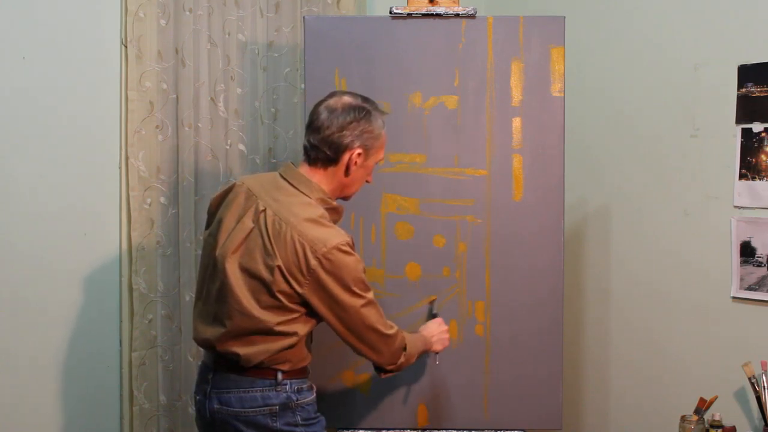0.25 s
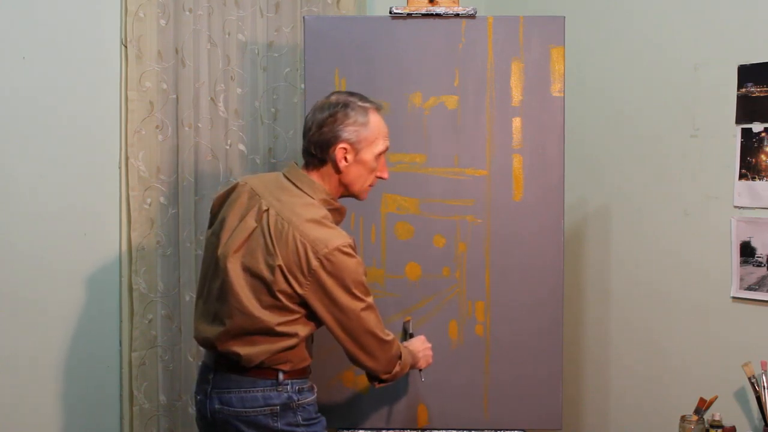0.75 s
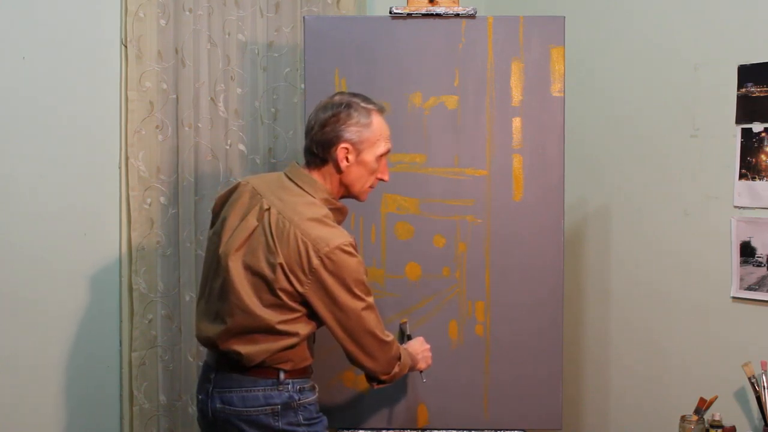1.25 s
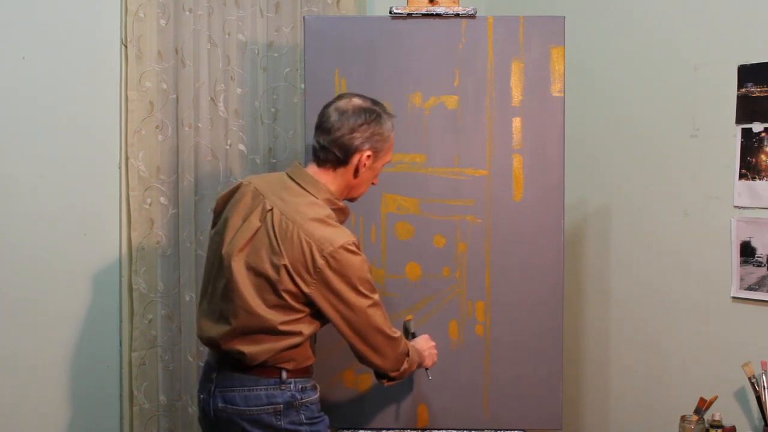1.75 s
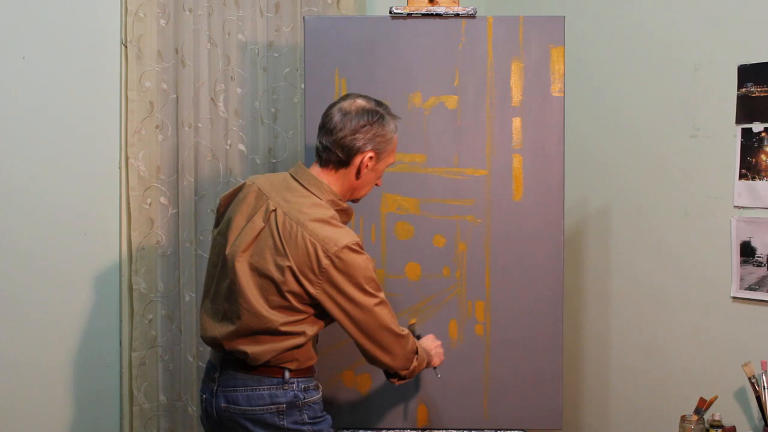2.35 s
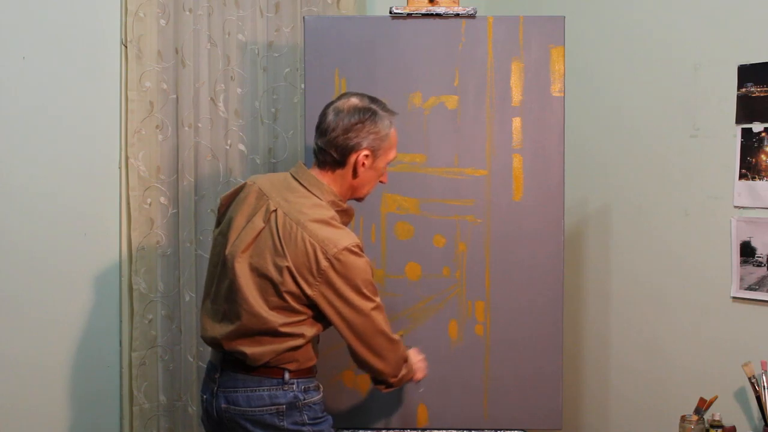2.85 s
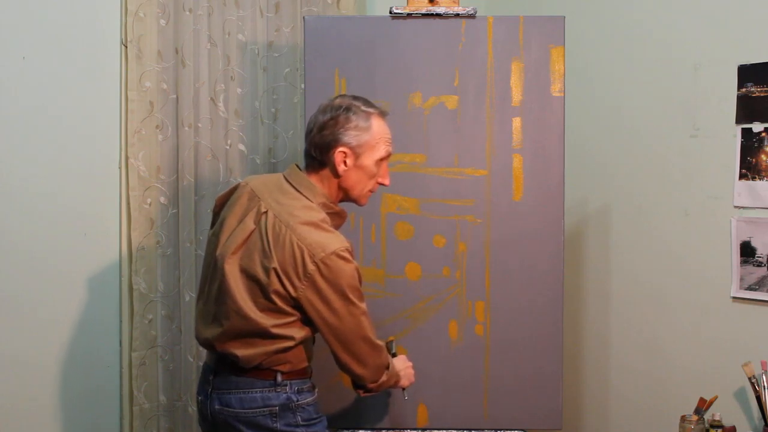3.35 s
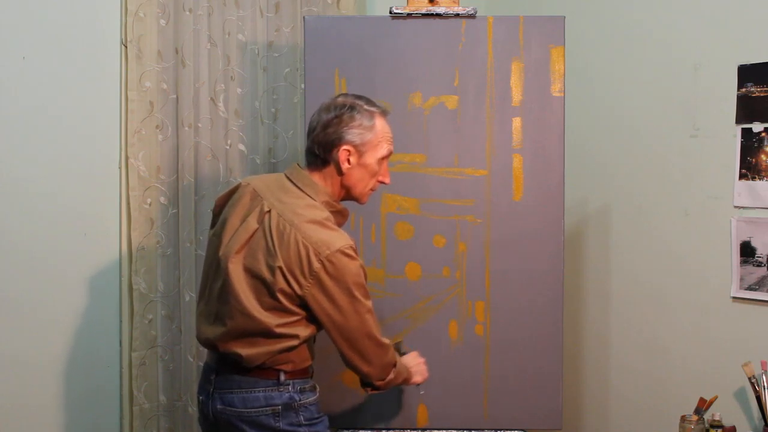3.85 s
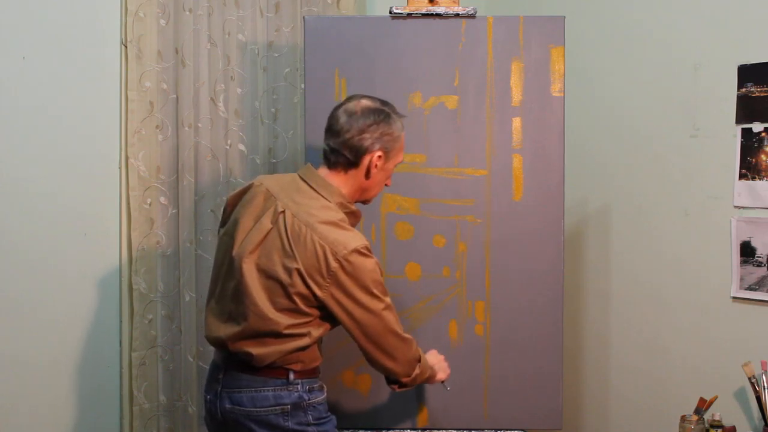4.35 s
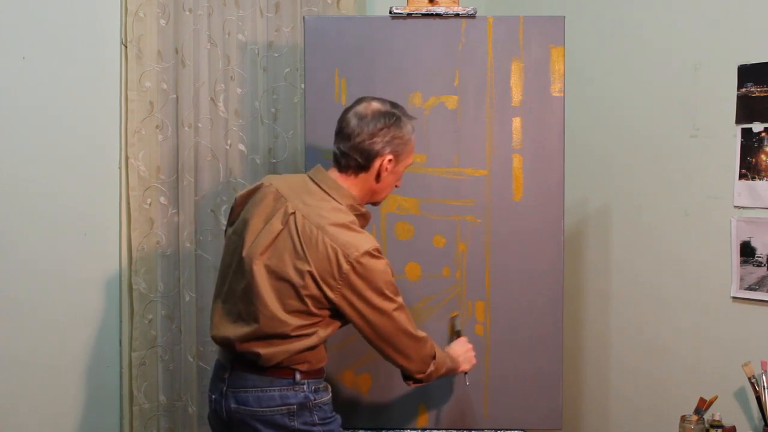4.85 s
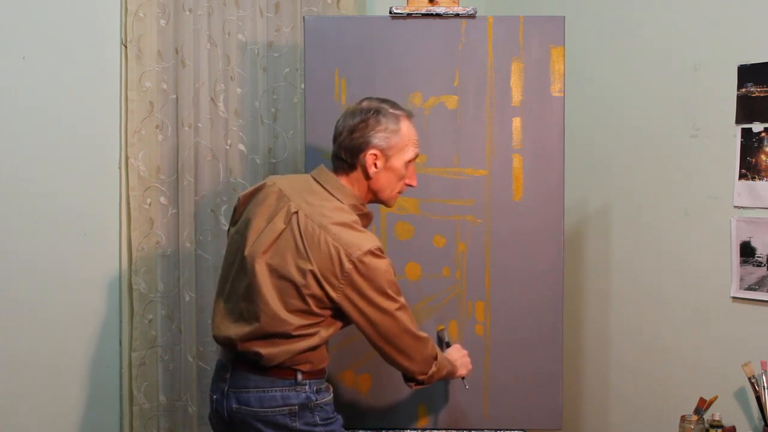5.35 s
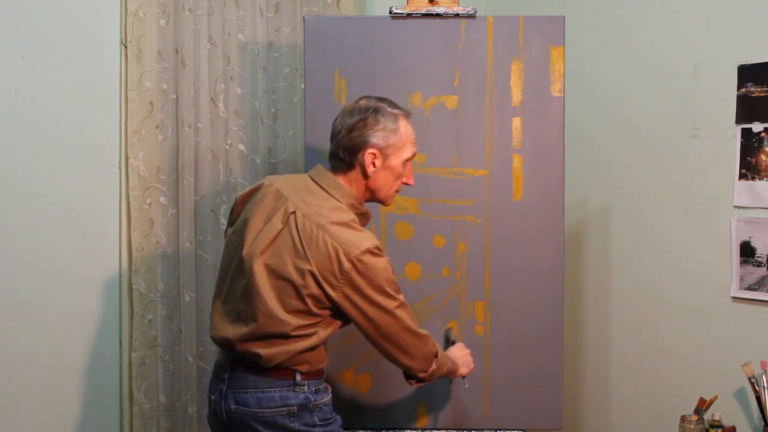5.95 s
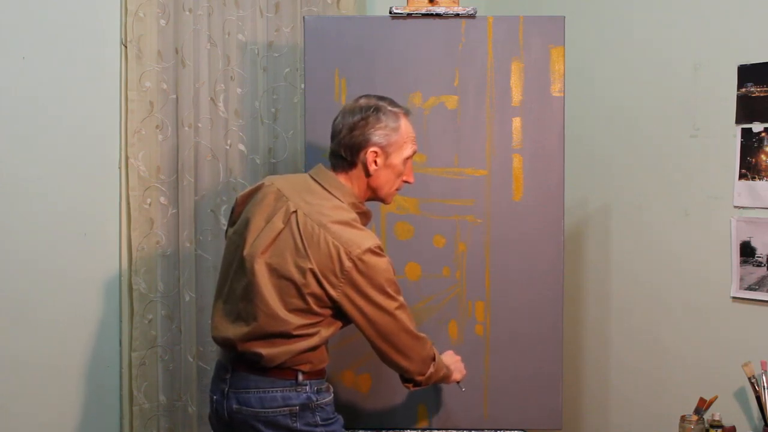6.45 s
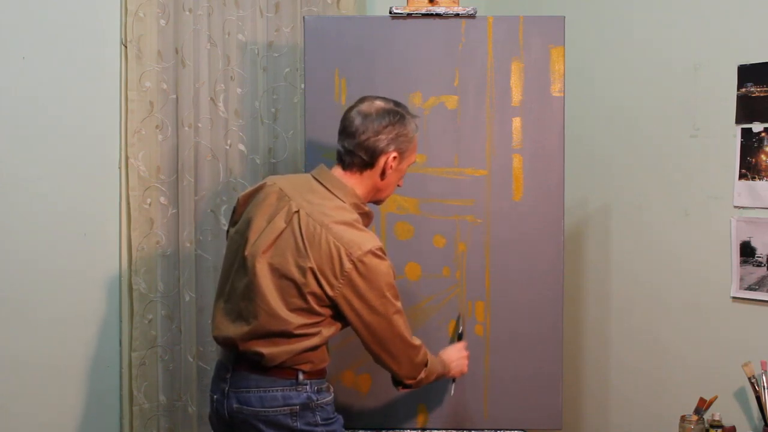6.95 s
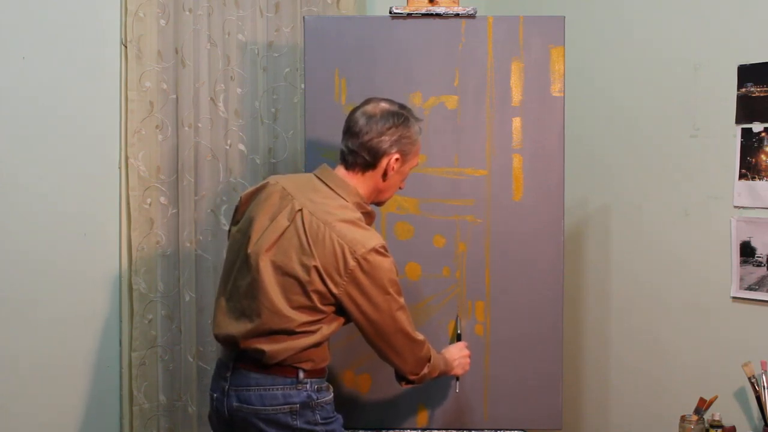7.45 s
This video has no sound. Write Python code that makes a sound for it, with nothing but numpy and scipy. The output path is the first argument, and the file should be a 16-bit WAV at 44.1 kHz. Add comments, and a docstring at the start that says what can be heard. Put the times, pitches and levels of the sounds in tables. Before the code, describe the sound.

Quick to-and-fro bristle strokes rasp on taut canvas, about five or six a second, each a short soft-edged swish with a hollow papery body. They come in groups separated by short pauses, strongest before the middle, weaker and sparser late. Faint thin squeaks, muffled pushes on the cloth and soft rustling join in. A muffled engine passes outside over a deep unsteady drone. Close microphone in a small room with short reverb.

```python
"""In a small studio a painter scrubs a stiff brush to and fro over a stretched canvas, with short pauses.
Random bristle slips hiss, scratch, drum the canvas and ring faintly in the brush; softer strokes sound darker.
Pushes of the tuft boom, thin wavering tones squeak, and a soft low rustle swells; all of these get a short reverb.
Outside an engine gathers speed as it passes, a stack of sines, over a deep unsteady drone and quiet room noise."""
import sys
import numpy as np
from scipy import signal
from scipy.fft import rfft, irfft, next_fast_len
from scipy.io import wavfile

SR = 44100
rng = np.random.default_rng(int(sys.argv[2]) if len(sys.argv) > 2 else 0)


def output_pcm(signal):
    """Save a mono or channel-first signal as 16-bit PCM at the path in sys.argv[1].

    Samples are clipped to [-1, 1] before scaling.
    """
    pcm = np.clip(np.atleast_2d(signal).T, -1, 1) * 32767
    wavfile.write(sys.argv[1], SR, np.round(pcm).astype(np.int16))


N = 340026
T = np.arange(N) / SR  # time in seconds

# The brush lands or turns and nudges the canvas.
# Each row: time of the strongest push in s, length in s, boom of the cloth in dB, scrape of bent bristles in dB.
NUDGE_MOVES = [(.45, 0.13, -52, -53), (1.651, 0.097, -50, -57), (2.333, 0.073, -53.5, -60),
               (4.497, 0.31, -49.5, -53.5), (7.31, 0.14, -45.5, -48), (7.584, .125, -45.5, -60)]
NUDGE_RISE_SHARE = 0.42  # part of a nudge spent pushing in


def undb(db):
    """Decibels to gain."""
    return 10 ** (np.asarray(db) / 20)


def unit(x):
    """Scale to rms 1."""
    return x / np.sqrt(np.mean(x ** 2))


def curves(table):
    """Each column after the time, joined by straight lines and held at the ends."""
    s, *columns = np.transpose(table)
    return [np.interp(T, s, c) for c in columns]


def filtered(x, response):
    """Pass x through a response given as a function of frequency."""
    size = next_fast_len(N + SR // 2)
    hz = np.fft.rfftfreq(size, 1 / SR) + 1e-3  # just above zero, so that logarithms work
    return irfft(rfft(x, size) * response(hz), size)[:N]


def colour(x, points):
    """Equalise x through (Hz, dB) points joined on a log frequency axis, at rms 1."""
    hz, db = np.transpose(points)
    return unit(filtered(x, lambda f: undb(np.interp(np.log(f), np.log(hz), db))))


def resonate(x, modes):
    """Excite damped (Hz, width Hz, dB) modes with x, at rms 1."""
    def response(f):
        total = 0
        for hz, width, db in modes:
            gain = undb(db) / np.sqrt(width)
            total = total + gain / (1 + 1j * (f * f - hz * hz) / (f * width))
        return total
    return unit(filtered(x, response))


def walk(rate_hz):
    """Smooth random curve that moves mostly slower than rate_hz, at rms 1."""
    return unit(filtered(rng.standard_normal(N), lambda f: 1 / (1 + (f / rate_hz) ** 4)))


def catches(per_s, spread_db):
    """Tiny impulses at random moments, each of its own size and sign, at rms 1."""
    size_db = spread_db * np.clip(rng.standard_normal(N), -2, 2)
    size = rng.choice([-1, 1], N) * undb(size_db)
    chance = np.clip(per_s / SR, 1e-4, 1)
    # dividing by the root keeps the power even while the density changes
    return unit((rng.random(N) < chance) * size / np.sqrt(chance))


def swing(peak_s, length_s, rise_share=.46, roundness=1.19):
    """One smooth swell, as of a hand's speed: from rest to a top of 1 and back to rest."""
    side_s = length_s * np.where(T < peak_s, rise_share, 1 - rise_share)
    u = (T - peak_s) / side_s
    speed, moving = np.zeros(N), np.abs(u) < 1
    speed[moving] = np.cos(np.pi / 2 * u[moving]) ** roundness
    return speed


def brush(slow_per_s=1500, fast_per_s=8000, tuft_db=-0.43, tuft_hz=70, bend_s=0.0022, ring_db=-16):
    """A faster stroke crosses more threads; the same slips feed the hiss, scratch, canvas and the brush's ring."""
    # Strokes. Each row: time of top speed in s, length in s, level of the hiss in dB.
    strokes = [ (.005, 0.16, -47), (0.166, 0.19, -45.5), (.28, .27, -44.5), (0.52, .22, -43),
               (1.252, 0.14, -58), (1.418, 0.18, -45), (1.53, 0.13, -48.5), (1.655, .135, -44),
               (1.773, 0.2, -44.5), (1.958, 0.19, -40), (2.096, 0.18, -42), (2.243, .16, -43),
               (2.39, 0.2, -44), (2.595, .22, -39.5), (2.825, .21, -39.5), (2.927, 0.21, -46.5),
               (3.745, 0.24, -56.5), (3.978, 0.29, -47.5), (4.121, 0.27, -44.5), (4.315, 0.21, -42.5),
               (4.473, 0.17, -49), (4.562, .25, -42), (4.762, 0.18, -43), (4.915, 0.17, -44.5),
               (5.036, .18, -44), (5.192, .19, -50.5), (5.33, .14, -52), (5.478, 0.15, -50.5),
               (5.622, 0.21, -50), (5.866, .19, -45.5), (6.099, .185, -43.5), (6.393, 0.12, -57),
               (6.555, 0.17, -48), (6.646, .24, -46), (7.306, 0.18, -53), (7.602, 0.15, -53)]
    # Tone of the bristle tips on the weave. Each row: frequency in Hz, relative level in dB.
    hiss_tone = [(800, -39), (2000, -7), (3200, -11.5), (4400, -4.5), (5600, -3), (7000, 0), (8100, -2),
                 (9500, -10), (12000, -22.5), (15500, -39)]
    # Tone of bent bristles dragging. Each row: frequency in Hz, relative level in dB.
    scratch_tone = [(800, -14), (1800, -19), (2600, -2), (3500, 0.5), (4500, -3.5), (6000, -5.5),
                    (8000, -20), (12000, -52), (15500, -62)]
    # Tone of the canvas as a sounding board. Each row: frequency in Hz, relative level in dB.
    canvas_tone = [(90, -9), (200, -4), (340, 6), (520, 1), (680, 1), (1080, 6.5), (1330, 4.5), (1560, 7.5),
                   (2100, 4), (2700, 5), (4000, -15), (8000, -33.5), (15500, -58)]
    # Modes of the brush ferrule and handle. Each row: frequency in Hz, width in Hz, relative level in dB.
    brush_modes = [(1123, 70, -4), (1580, 45, 6), (1670, 29, -13), (2440, 40, -5), (2860, 26, -8),
                   (3060, 28, -1), (6900, 60, -7)]
    firm_db = -43.5  # hiss of an ordinary firm stroke
    # level in a firm stroke with a wet brush, and dB gained per dB of hiss
    scratch_db, scratch_db_per_db = -49.5, 0.96
    canvas_db, canvas_db_per_db = -49, 0.5
    drying_db_per_s = 0.32  # the brush grows scratchier as its paint runs out

    speed, tip_power, scratch_power, canvas_power = np.zeros((4, N))
    for s, length, db in strokes:
        stroke = swing(s, length)
        speed += stroke
        tip_power += (stroke * undb(db)) ** 2
        # tips touch first; the darker sounds swell a moment later, as bristles bend, and grow less with effort
        bent = swing(s + bend_s, length)
        effort_db = db - firm_db
        stroke_scratch_db = scratch_db + scratch_db_per_db * effort_db + drying_db_per_s * s
        scratch_power += (bent * undb(stroke_scratch_db)) ** 2
        canvas_power += (bent * undb(canvas_db + canvas_db_per_db * effort_db)) ** 2

    # a nudge bends the bristles without sweeping the tips
    scrape = sum(undb(db) * swing(s, length, NUDGE_RISE_SHARE) for s, length, _, db in NUDGE_MOVES)
    scratch_level = np.sqrt(scratch_power + scrape ** 2)
    canvas_level = np.sqrt(canvas_power + scrape ** 2)

    # bristles let go in tufts, so the rubbing is never even
    slips = catches(slow_per_s + fast_per_s * speed, spread_db=2.8) * undb(tuft_db * walk(tuft_hz))
    # each slip kicks every part of the brush and cloth with its own sign
    tips, shafts, cloth, handle = slips * rng.choice([-1, 1], (4, N))
    ring = undb(ring_db) * resonate(handle, brush_modes)
    hiss = np.sqrt(tip_power) * (colour(tips, hiss_tone) + ring)
    scratch = scratch_level * colour(shafts, scratch_tone)
    drumming = canvas_level * colour(cloth, canvas_tone)
    return hiss + scratch + drumming


def rustle(rise_share=0.44):
    """Soft low rustle that swells and fades, perhaps cloth, with road noise in the long swell."""
    # Swells of the rustle. Each row: time of the peak in s, length in s, level in dB.
    swells = [(.25, 1.2, -53.5), (1.482, 0.73, -55), (3.98, .45, -51.5), (5.1, 3.26, -52),
              (6.714, 2.4, -53), (7.443, 0.74, -48)]
    # Tone of the rustle. Each row: frequency in Hz, relative level in dB.
    rustle_tone = [(100, -1), (200, 1), (300, 1), (380, -1.5), (520, -1), (750, -4.5), (1100, -4.5),
                   (2000, -12.5), (4000, -18.5), (8000, -20.5), (14000, -60)]
    power = sum((undb(db) * swing(s, length, rise_share)) ** 2 for s, length, db in swells)
    return np.sqrt(power) * colour(catches(per_s=2500, spread_db=3.0), rustle_tone)


def air(level_db=-49.5, drift_db=0.5):
    """Quiet room noise whose level drifts a little."""
    # Tone of the still studio air. Each row: frequency in Hz, relative level in dB.
    air_tone = [(25, -19), (42, 6), (70, -6), (125, 3), (190, -1), (300, -7.5), (600, -12), (1000, -9.5),
                (1270, -13.5), (1600, -13.5), (3000, -20), (7000, -26), (11000, -35.5), (15500, -46)]
    return colour(rng.standard_normal(N), air_tone) * undb(level_db + drift_db * walk(3.0))


def drone(centre_hz=43.8, waver=0.062, flutter_db=2.5):
    """A deep drone near 44 Hz, later probably the engine's lowest order: one sine, unsteady in pitch and level."""
    # Swells of the drone. Each row: time in s, level in dB.
    swells = [(.4, -57), (.9, -68), (3.4, -77), (3.6, -54), (4.3, -60), (5.0, -52.5), (6.1, -57)]
    level_db, = curves(swells)
    phase = 2 * np.pi * np.cumsum(centre_hz * (1 + waver * walk(8.2))) / SR
    return np.sqrt(2) * undb(level_db + flutter_db * walk(9.1)) * np.sin(phase)


def engine(waver=0.0022, flutter_db=-0.3):
    """Low multiples of the turning rate come through the walls, swelling where they meet a room mode."""
    # The engine gathers speed. Each row: time in s, turning rate in Hz.
    turning = [(2.7, 42.66), (3.28, 45.02), (4.98, 48.7), (6.9, 50.83), (7.2, 50.8)]
    # It nears and leaves. Each row: time in s, level in dB added to every order.
    passing = [(2.0, -15), (2.5, -4.5), (4.5, -4), (5.3, -0.5), (6.72, 0.5), (6.98, -5), (7.71, -8.5)]
    # Engine orders. Each row: multiple of the turning rate, level in dB before passing and room lift.
    orders = [(2, -53.5), (3, -57), (4, -66), (5, -67)]
    # Room modes that lift an order sweeping through. Each row: frequency in Hz, width in Hz, lift in dB.
    room_modes = [(97.35, 3.4, 5), (148.8, 8.3, 10.5), (204.2, 6, 13.5), (244, 7, 8.5)]
    (hz,), (passing_db,) = curves(turning), curves(passing)
    turn = 2 * np.pi * np.cumsum(hz * (1 + waver * walk(9.7))) / SR
    hum = np.zeros(N)
    for k, db in orders:
        lift_db = sum(lift / (1 + (2 * (k * hz - centre) / width) ** 2) for centre, width, lift in room_modes)
        level = undb(db + lift_db + flutter_db * walk(23))
        hum += level * np.sin(k * turn + 2 * np.pi * rng.random())
    return np.sqrt(2) * undb(passing_db) * hum


def nudges(soft_hz=2500):
    """Soft pushes of the whole tuft make the cloth boom briefly."""
    # Low modes of the stretched canvas. Each row: frequency in Hz, width in Hz, relative level in dB.
    membrane = [(240, 45, -5), (312, 59, 1), (370, 32, 1.5), (512, 28, 4)]
    push = sum(undb(db) * swing(s, length, NUDGE_RISE_SHARE) for s, length, db, _ in NUDGE_MOVES)
    cushioned = filtered(catches(per_s=1500, spread_db=6.0), lambda f: 1 / (1 + (f / soft_hz) ** 2))
    return push * resonate(cushioned, membrane)


def squeaks(length_s=.17, waver_hz=13, flutter_db=3):
    """Thin, rough ringing tones, most near 2.88 kHz where the brush resonates, wobbling fast in pitch and level."""
    # Ringing tones. Each row: time of the peak in s, centre pitch in Hz, level in dB.
    squeak_tones = [(1.97, 1535, -57), (2.25, 2875, -57), (2.61, 2880, -53), (2.81, 2870, -57),
                    (2.86, 1130, -52), (4.15, 2880, -58)]
    wobble_hz, flutter = waver_hz * walk(92), undb(flutter_db * walk(60))
    tones = np.zeros(N)
    for s, hz, db in squeak_tones:
        phase = 2 * np.pi * np.cumsum(hz + wobble_hz) / SR
        tones += undb(db) * swing(s, length_s) * np.sin(phase)
    return np.sqrt(2) * flutter * tones


def studio(x, t60_s=0.56, treble_t60_s=0.63, wet_db=-2, treble_db=-4, gap_s=0.0029):
    """Direct sound plus dense reflections as fading noise; the treble comes back weaker."""
    t = T[:SR // 2]
    low_pass = signal.butter(2, 3500, fs=SR, output="sos")
    high_pass = signal.butter(2, 3500, "high", fs=SR, output="sos")
    low = signal.sosfilt(low_pass, rng.standard_normal(len(t)))
    high = signal.sosfilt(high_pass, rng.standard_normal(len(t)))
    low_fade, high_fade = 1000 ** (-t / t60_s), 1000 ** (-t / treble_t60_s)  # down 60 dB after each t60
    tail = low * low_fade + undb(treble_db) * high * high_fade
    tail = tail * (t > gap_s) / np.linalg.norm(low_fade)
    wet = undb(wet_db) * signal.fftconvolve(x, tail)[:N]
    return (x + wet) / np.sqrt(1 + undb(wet_db) ** 2)


def scene():
    """Brush and rustle in the reverberant studio, with engine, drone and air, the same in both channels."""
    close = brush() + squeaks() + nudges() + rustle()
    mono = studio(close) + engine() + drone() + air()
    return np.array([mono, mono])


def record(dry, top_hz=15500):
    """An elliptic low-pass cuts the top steeply."""
    return signal.sosfilt(signal.ellip(10, .2, 70, top_hz, fs=SR, output="sos"), dry)


dry = scene()
out = record(dry)
output_pcm(out)
```